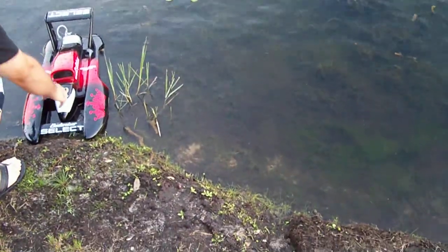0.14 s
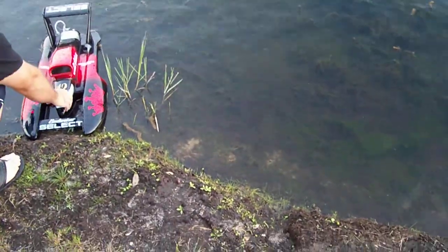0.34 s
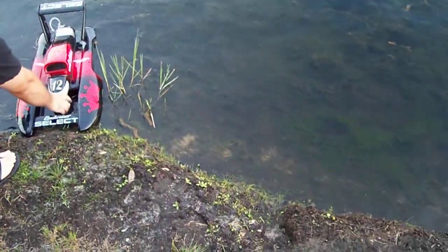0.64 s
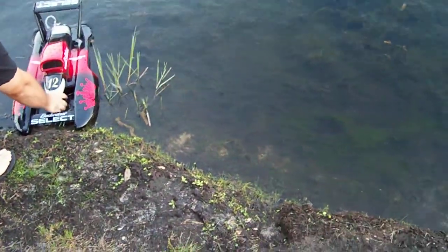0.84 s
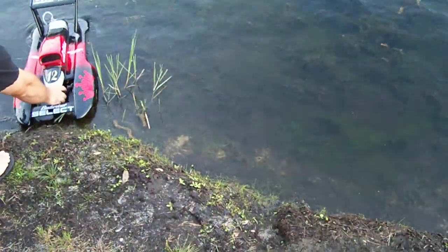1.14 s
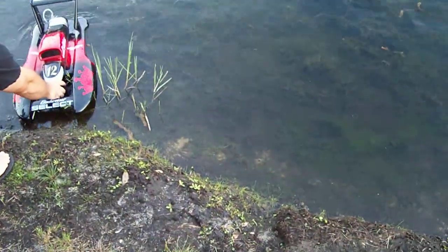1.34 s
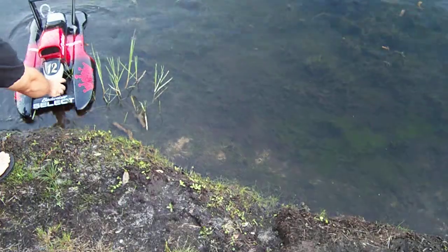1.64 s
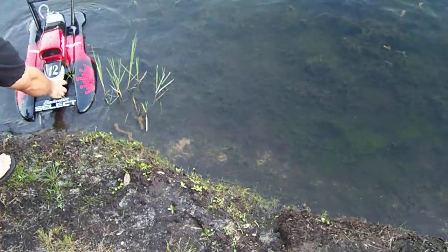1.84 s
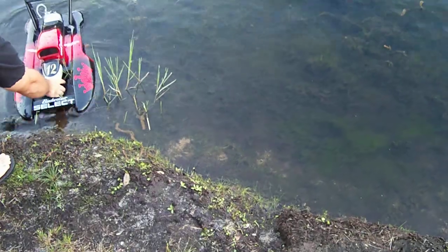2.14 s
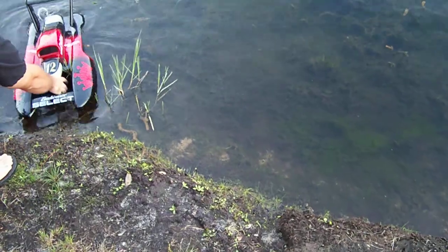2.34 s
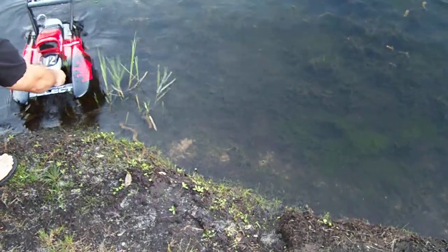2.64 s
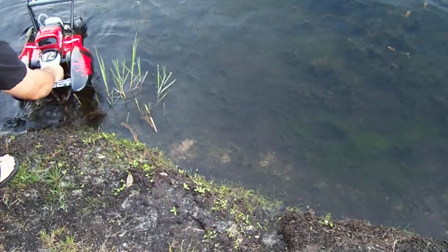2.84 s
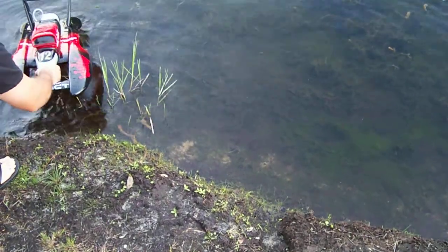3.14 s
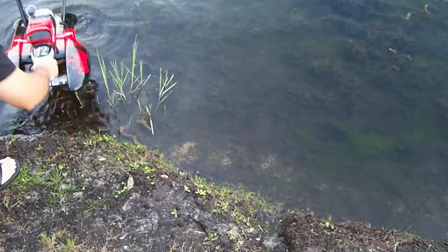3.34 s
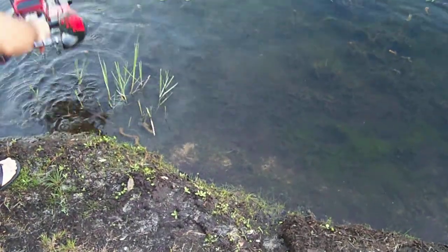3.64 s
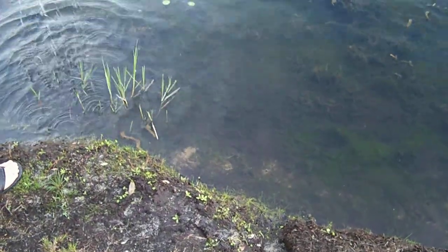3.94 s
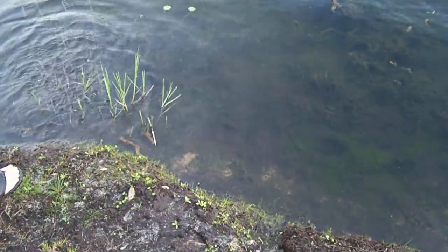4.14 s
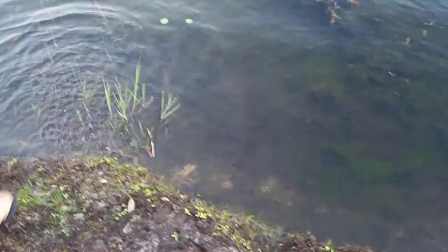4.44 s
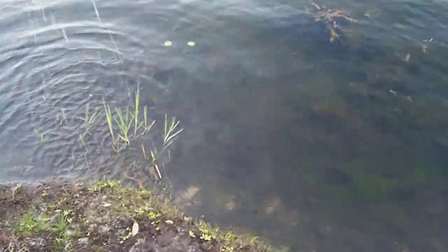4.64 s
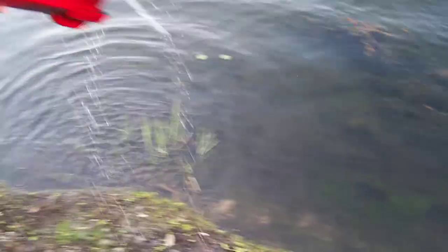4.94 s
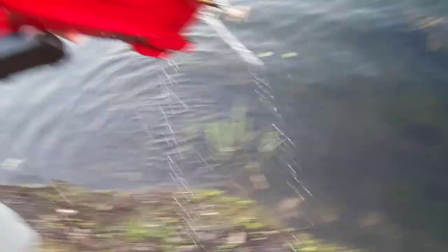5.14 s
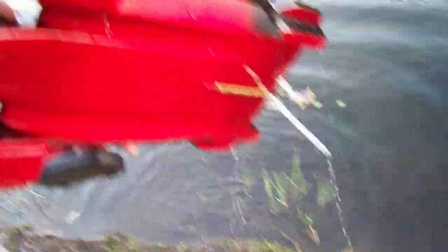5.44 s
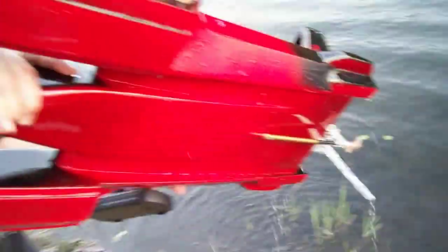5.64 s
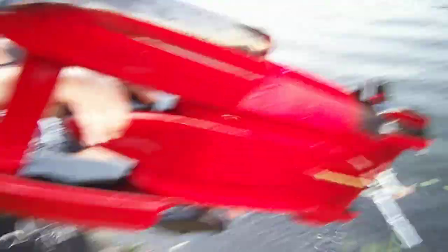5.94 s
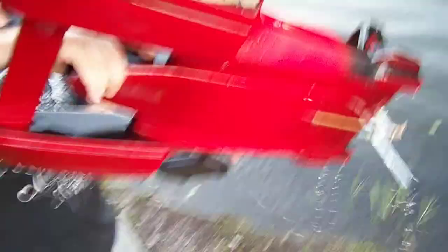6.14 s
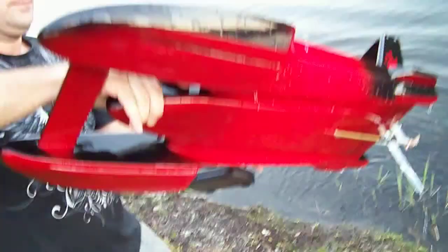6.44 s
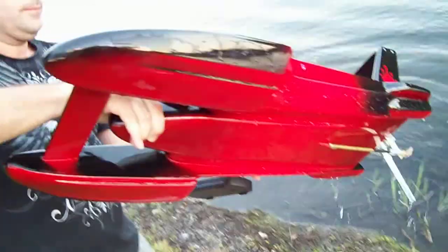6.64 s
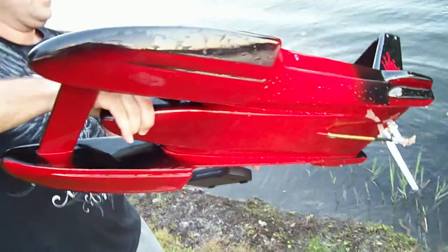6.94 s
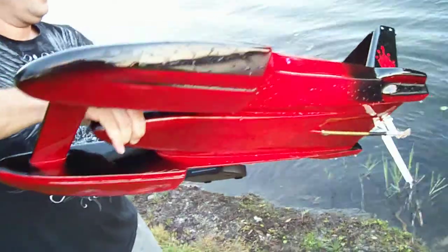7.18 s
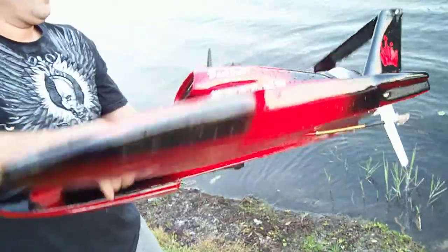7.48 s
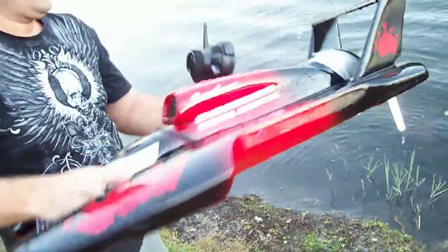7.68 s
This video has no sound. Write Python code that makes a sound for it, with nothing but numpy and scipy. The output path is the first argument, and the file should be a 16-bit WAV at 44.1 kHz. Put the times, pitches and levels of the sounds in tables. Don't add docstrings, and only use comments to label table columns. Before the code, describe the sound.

Outdoor traffic rumble with tyre hiss to the left, tiny drop-like clicks, and sudden loud finger bumps on the right side of the microphone.

```python
import sys
import numpy as np
from scipy import signal
from scipy.fft import irfft, next_fast_len
from scipy.io import wavfile
from scipy.ndimage import uniform_filter1d, map_coordinates

SR = 44100
rng = np.random.default_rng(int(sys.argv[2]) if len(sys.argv) > 2 else 0)


def output_pcm(signal):
    pcm = np.clip(np.atleast_2d(signal).T, -1, 1) * 32767
    wavfile.write(sys.argv[1], SR, np.round(pcm).astype(np.int16))


def gain_from_db(level_db):
    decades = np.asarray(level_db, float) / 20
    return 10 ** decades


N = 344421
TIME = np.arange(N) / SR
SIZE = next_fast_len(N)
FREQ = np.maximum(np.arange(SIZE // 2 + 1) * SR / SIZE, 1)

# time_s, recorder_gain_db, right_port_lag_ms, right_treble_shade_db
GRIP = [
    (0, -0.57, 0.25, -2),
    (2.5, -1, 0.22, 0),
    (4.5, -0.1, 0.2, -1),
    (4.58, -11.5, 0.26, -14),
    (4.66, -7.5, 0.34, -22),
    (5.55, -8.5, 0.34, -9.5),
    (5.7, -1.4, 0.3, -19),
    (5.97, -0.5, 0.36, -14),
    (6.17, 0.57, 0.19, 0.2),
    (7.81, 1.5, 0.19, 2.5),
]
# centre_s, half_length_s, rub_db, weight_db (heavier is darker)
RUBS = [(3.783, .004, -38, -1), (3.814, 0.025, -53, -6.5), (4.077, 0.036, -55, -9), (4.27, 0.052, -48, -10),
        (4.481, 0.024, -39.5, -5), (4.515, 0.017, -23, -3.5), (4.536, 0.014, -10.5, 3),
        (4.568, 0.024, -18.5, 12.5), (4.595, 0.011, -26.5, 12.5), (4.619, 0.014, -28, 13),
        (4.83, 0.0035, -36, 2), (4.842, 0.0093, -29.5, 8), (5.011, .035, -34, 9.5), (5.3, 0.021, -51.5, 11),
        (5.8, 0.013, -32.5, 7), (5.906, 0.013, -31, 7.5), (6.003, 0.023, -19.5, 6.5),
        (6.068, 0.027, -27.5, 4.5), (6.099, 0.01, -18, 0.5), (6.139, 0.027, -28, 1.5),
        (6.573, 0.028, -28.5, 1)]
# centre_s, width_ms, push_full_scale
PRESSES = [(4.548, 2, .7), (4.605, 5, .3), (4.623, 2, .45), (6.021, 3.5, .45), (5.992, 3, .55),
           (5.98, 5, -.25), (4.815, 9, -.1), (4.829, 2.2, -.85), (4.842, 8, .68), (4.995, 1.5, -.3),
           (5.018, 9, .22), (5.078, 8, -.1), (5.287, 3, -.12), (5.305, 12, .1), (5.802, 6, .48),
           (5.891, 5, -.3), (5.908, 6, .55), (6.099, 7, .3), (6.581, 2.2, -.35), (6.588, 3.5, .3),
           (6.602, 6, .2)]
# centre_s, half_length_s, flap_hz, swing_full_scale
FLAPS = [
    (4.575, 0.017, 50.4, -0.99),
    (6.007, 0.019, 69.6, -0.36),
]
# start_s, peak_db, ring_hz, left_minus_right_db
TICKS = [(0.2748, -39, 3180, -4), (2.0448, -35, 4630, -5), (2.512, -40, 5160, -2),
         (2.5598, -44, 5200, -0.5), (2.9261, -38, 3620, -2), (3.7451, -49.5, 6860, -4),
         (3.7793, -41.5, 5600, 5.5), (3.8815, -44.5, 6120, 3.5), (4.0491, -46, 6900, -2.5),
         (4.1943, -50, 6500, -7), (4.2621, -43, 5200, 0), (4.3089, -43.5, 5560, -12.5),
         (4.7253, -40.5, 4960, 20), (4.828, -45.5, 5030, -11), (4.9846, -45.5, 3316, -15),
         (5.8933, -48.5, 3040, -14)]
# start_s, peak_db, ring_hz, left_minus_right_db
KNOCKS = [(4.726, -30.5, 1040, 18), (5.093, -34, 640, -10), (5.285, -26, 340, 8), (5.975, -25.5, 1200, -11),
          (6.097, -24.5, 1900, -17), (4.832, -29.5, 560, -17.5), (3.7795, -28, 3300, -1),
          (3.781, -30, 1900, -1), (4.986, -43, 3300, -12), (4.585, -19, 510, -30.5)]
# start_s, peak_db, ring_hz, left_minus_right_db
DRIPS = [(2.866, -38, 2400, 1)]
# centre_hz, density_db_per_hz, share_ahead, share_all_round, right_port_db; rest from left
ROAD_COLOUR = [(25, -52, 0.99, 0.09, -6), (89.5, -50.5, 1, 0.05, -3), (250, -58, 0.84, 0.08, -3.5),
               (383, -75.5, 0.78, 0.25, -4), (595, -69.5, 0.77, 0.16, -3), (990, -65, 0.68, 0.38, -3),
               (1224, -68, 0.03, 0.4, -1.5), (1530, -63.5, 0.07, 0.05, -5.5), (2430, -69, 0.01, 0.09, -2.5),
               (2793, -73, 0, 0.21, -3.5), (3710, -84, 0.04, 0.1, -1), (5600, -94, 0, .45, -0.2),
               (7700, -99, 0, 0.6, 1), (9000, -113, 0.1, .7, -9)]
# centre_s, half_length_s, centre_hz, swell_db
CARS = [(0, 0.39, 2700, 3), (1.05, .35, 1491, 4), (1.45, 0.49, 4367, 8.5), (2.0, 0.18, 4500, 6.5),
        (1.3, 0.36, 2700, -0.5), (2.95, 0.76, 4600, 4.5), (3.15, 0.49, 1100, 4), (3.5, .15, 2700, 2.5),
        (4.2, .3, 4600, 3), (5.1, .3, 3300, 1), (5.903, .2, 2730, 2.5), (6.907, 0.97, 1200, 3.5),
        (6.9, 0.28, 3250, 5.5), (7.3, 0.14, 3300, 3.5), (7.0, 0.43, 5545, 0.5), (7.8, 0.13, 4120, 5),
        (6.4, 0.22, 2945, 2.5), (6.45, 0.07, 6200, 1)]
BANDS_HZ = 20 * 2 ** np.r_[0:6:.55, 6:8.2:.22, 8.2:9.3:.4]
# time_s, firing_rate_hz, load_db
LORRY = [(0, 70.8, -34.5), (0.2, 66, -31.5), (0.38, 57.24, -31.5), (0.75, 68.87, -33), (1.5, 70.1, -30.5),
         (2.2, 65.86, -28), (2.75, 65, -30.5), (3.06, 52.1, -35), (3.45, 58, -41), (3.65, 57, -26.5),
         (3.82, 56.9, -34), (4, 59.88, -27), (4.48, 64.22, -25.5), (5.55, 64.93, -25.5),
         (5.95, 64.3, -28.5), (6.3, 64.4, -28.5), (7, 64.15, -28), (7.81, 63.17, -29.5)]
# time_s, near_db
NEAR = [(0, -2.5), (1, -2), (2.6, 1), (3.3, 0.5), (3.8, 2), (5.6, 2), (6.1, 2), (7.81, 2.5)]
ORDERS_DB = [0, -12, -15.5, -24.5, -30.5]
ORDERS_PER_NEAR = [0, 1.8, 0, 1.6, 1.2]
# tone_hz, level_db
WHINE = [(7829, -83), (8171, -86)]


def finger():
    return np.array([.003, 1])[:, None] * (rub() + pump())


def rub():
    rumble_db, scrape_db, scrape_db_per_weight_db = 1.0, -7.5, 1
    rest_crackle_db, moving_crackle_db, linger_s = -70.5, -36.5, .07
    centre_s, half_s, rub_db, weight_db = np.transpose(RUBS)
    swell = np.array([np.exp(-np.abs((TIME - s) / half) ** 1.68 * 0.98) for s, half in zip(centre_s, half_s)])
    low = gain_from_db(rub_db + rumble_db + weight_db) @ swell
    middle = gain_from_db(rub_db) @ swell
    high = gain_from_db(rub_db + scrape_db - scrape_db_per_weight_db * weight_db) @ swell

    skin = low * band(188, 1.0)
    skin += middle * band(800, 0.89) * gain_from_db(1.9 * walk(200))
    skin += high * band(2900, 0.82) * gain_from_db(1.5 * walk(300))

    moving = np.maximum(uniform_filter1d(high, int(linger_s * SR)), 0)
    grain_db = 4 * walk(350) + 1.5 * walk(30)
    crackle = gain_from_db(rest_crackle_db) + gain_from_db(moving_crackle_db) * np.sqrt(moving)
    return skin + crackle * gain_from_db(grain_db) * band(6000, 0.67)


def pump():
    pressure = np.zeros(N)
    for centre_s, width_ms, push in PRESSES:
        pressure += push * np.exp(-.5 * ((TIME - centre_s) * 1000 / width_ms) ** 2)
    for centre_s, half_s, flap_hz, swing in FLAPS:
        t = TIME - centre_s
        pressure += swing * np.exp(-(t / half_s) ** 4) * np.cos(2 * np.pi * flap_hz * t)
    vent = signal.butter(1, 12, "high", fs=SR, output="sos")
    return signal.sosfilt(vent, pressure)


def ticks(table, t60_s, ratios, crack_db=-7.5):
    out, t = np.zeros((2, N)), np.arange(1500) / SR
    decay = np.exp(-np.log(1000) * t / t60_s)
    spits = np.diff(rng.standard_normal((len(table), len(t) + 1)))
    for (start_s, peak_db, ring_hz, pan_db), spit in zip(table, spits):
        overtone_hz = np.minimum(ring_hz * np.array(ratios), 8100)
        overtones = np.sin(2 * np.pi * overtone_hz[:, None] * t).sum(0)
        crack = gain_from_db(crack_db) * min(ring_hz / 4000, 1) * spit
        hit = (np.sin(2 * np.pi * ring_hz * t) + 0.31 * overtones + crack) * decay
        i = int(start_s * SR)
        out[:, i:i + len(t)] += gain_from_db(peak_db + np.array([[pan_db], [-pan_db]]) / 2) * hit
    return out


def road(gain_db, lag_ms, shade_db):
    rumble_top_hz = 425
    near_db = curves(NEAR)[0]
    colour_hz, *colour = np.transpose(ROAD_COLOUR)
    density_db, ahead, around, _ = (np.interp(np.log(FREQ), np.log(colour_hz), c) for c in colour)
    ahead, around = np.clip([ahead, around], 0, 1)
    left, right, late = np.zeros((3, N))
    place = np.interp(np.log(FREQ), np.log(BANDS_HZ), np.arange(len(BANDS_HZ)))
    for k, hz in enumerate(BANDS_HZ):
        shape = gain_from_db(density_db) * np.cos(np.pi / 2 * np.clip(place - k, -1, 1))
        cars_db = car_swell_db(hz)
        rumble_db = near_db / (1 + (hz / rumble_top_hz) ** 2)
        gain = gain_from_db(gain_db + cars_db + rumble_db + 0.8 * walk(9))
        port_db = np.interp(np.log(hz), np.log(colour_hz), colour[3])
        port = gain * gain_from_db(port_db + shade_db * np.clip(np.log2(hz / 1900), 0, 1))

        far = gain_from_db(-.5 * cars_db)
        front = far * noise(shape * np.sqrt((1 - around) * ahead))
        side = noise(shape * np.sqrt((1 - around) * (1 - ahead)))
        left += gain * (front + side + far * noise(shape * np.sqrt(around)))
        right += port * (front + far * noise(shape * np.sqrt(around)))
        late += port * side
    lagged = np.arange(N) - lag_ms * SR / 1000
    return np.array([left, right + map_coordinates(late, [lagged], order=3, mode="nearest")])


def car_swell_db(hz):
    low_octaves, top_octaves, edge_power = 0.65, 0.2, 4
    centre_s, half_s, centre_hz, swell_db = np.transpose(CARS)
    passing = np.exp(-np.abs((TIME - centre_s[:, None]) / half_s[:, None]) ** edge_power)
    octaves = np.where(hz > centre_hz, top_octaves, low_octaves)
    return (swell_db * np.exp(-.5 * (np.log2(hz / centre_hz) / octaves) ** 2)) @ passing


def lorry(gain_db):
    exhaust_db, exhaust_db_per_near_db = -48, 2.83
    firing_hz, load_db = curves(LORRY)
    near_db = curves(NEAR)[0]
    phase = 2 * np.pi * np.cumsum(firing_hz * (1 + .005 * walk(10))) / SR
    hum = np.zeros(N)
    for k, (order_db, rise) in enumerate(zip(ORDERS_DB, ORDERS_PER_NEAR)):
        waver_db = (1.5 + .6 * k) * walk(7)
        level_db = load_db + order_db + rise * near_db + waver_db
        hum += gain_from_db(level_db) * np.sqrt(2) * np.sin((k + 1) * phase + k)
    roar_db = exhaust_db + exhaust_db_per_near_db * near_db + 0.88 * walk(14)
    hum += gain_from_db(roar_db) * band(340, 0.44)
    return hum * gain_from_db(gain_db + np.array([[0.1], [-3.6]]))


def whine(gain_db):
    tones = np.zeros(N)
    for tone_hz, level_db in WHINE:
        tones += gain_from_db(level_db + 6.5 + gain_db) * np.sin(2 * np.pi * tone_hz * TIME + .3 * walk(30))
    return tones


def curves(table):
    time_s, *columns = np.transpose(table)
    return [np.interp(TIME, time_s, c) for c in columns]


def noise(shape):
    used = np.flatnonzero(shape > shape.max() * 1e-5)
    lines = np.zeros(len(FREQ), complex)
    lines[used] = shape[used] * (rng.standard_normal((len(used), 2)) @ [1, 1j])
    return irfft(lines * np.sqrt(SIZE * SR / 4), SIZE)[:N]


def band(centre_hz, octaves):
    x = noise(np.exp(-.5 * (np.log2(FREQ / centre_hz) / octaves) ** 2))
    return x / x.std()


def walk(rate_hz):
    k = int(SR / rate_hz)
    held = np.repeat(rng.standard_normal(N // k + 1), k)
    return 1.257 * uniform_filter1d(uniform_filter1d(held, k), k)[:N]


def scene():
    gain_db, lag_ms, shade_db = curves(GRIP)
    small = ticks(TICKS, t60_s=.008, ratios=(.8, 1.3))
    small += ticks(KNOCKS, t60_s=.0084, ratios=(1.35, 1.9))
    small += ticks(DRIPS, t60_s=.04, ratios=(.94, 1.05), crack_db=-30)
    traffic = road(gain_db, lag_ms, shade_db) + lorry(gain_db)
    return finger() + small + traffic + whine(gain_db)


def band_limit(x):
    return signal.sosfilt(signal.butter(12, 8670, fs=SR, output="sos"), x)


def record(dry):
    clipped = np.clip(dry, -.985, .985)
    low_pass = signal.cheby2(8, 30, 8900, fs=SR, output="sos")
    mix = signal.sosfilt(low_pass, clipped)
    return band_limit(mix)


dry = scene()
out = record(dry)
output_pcm(out)
```